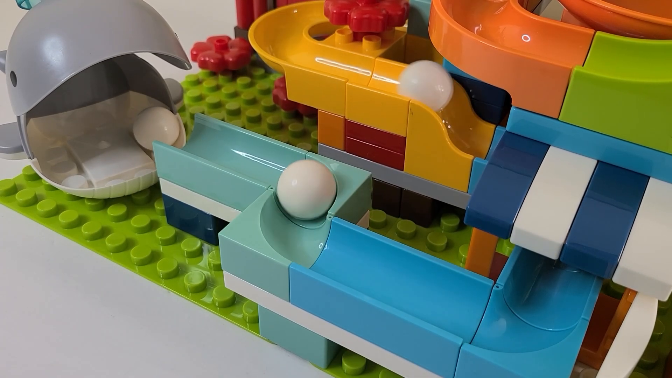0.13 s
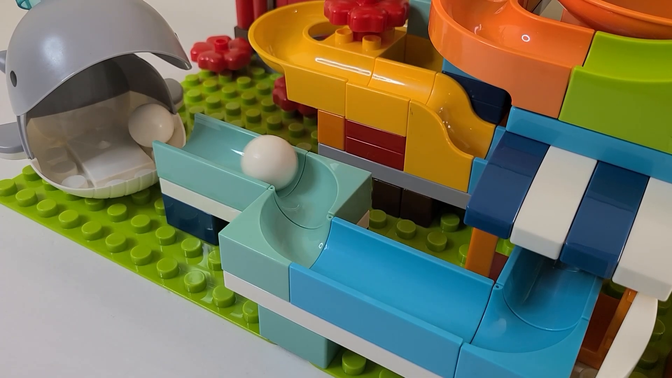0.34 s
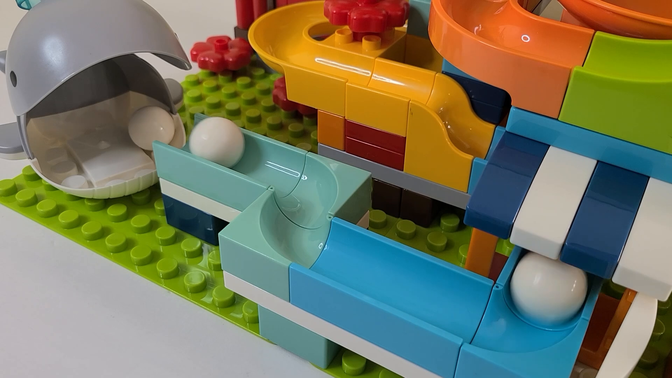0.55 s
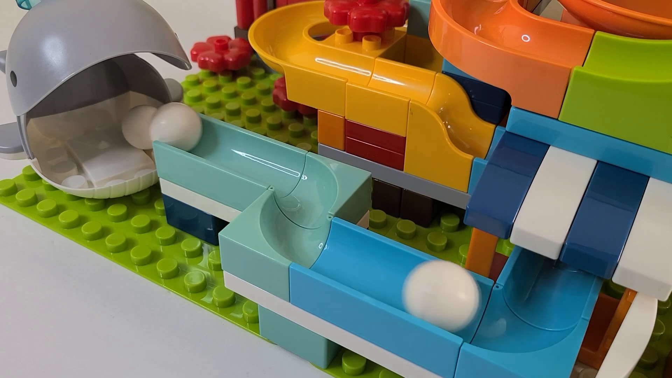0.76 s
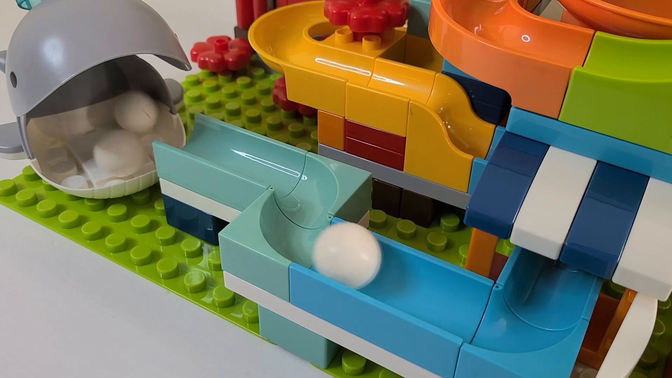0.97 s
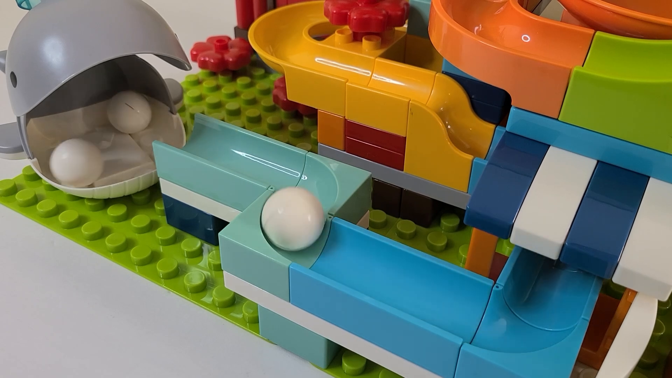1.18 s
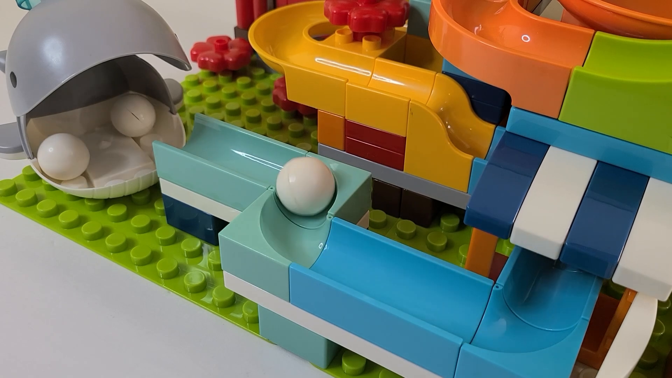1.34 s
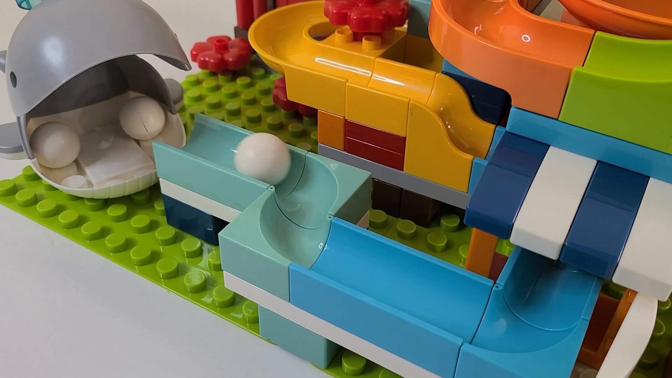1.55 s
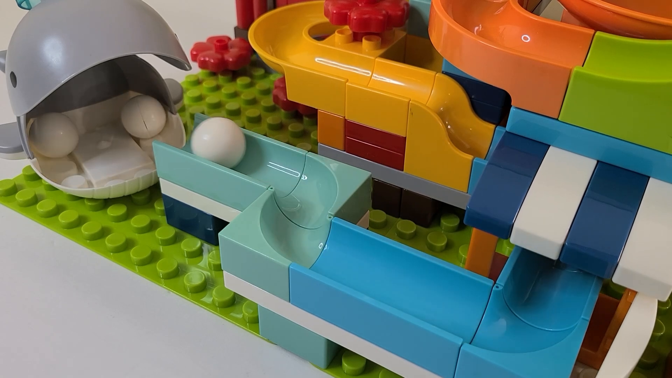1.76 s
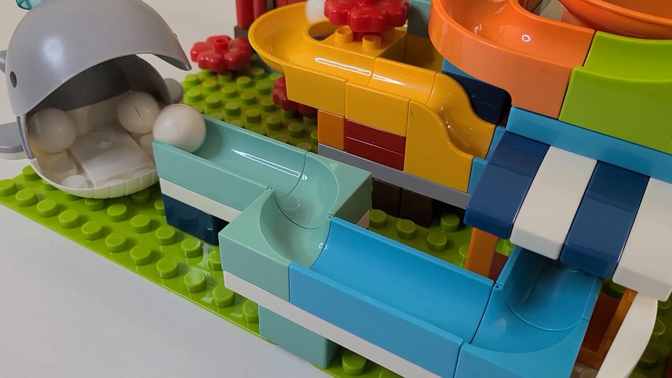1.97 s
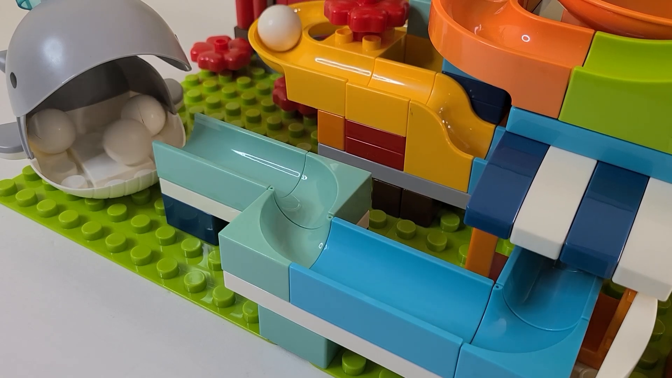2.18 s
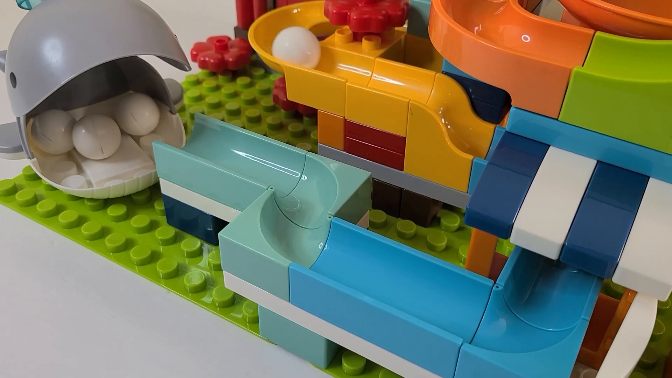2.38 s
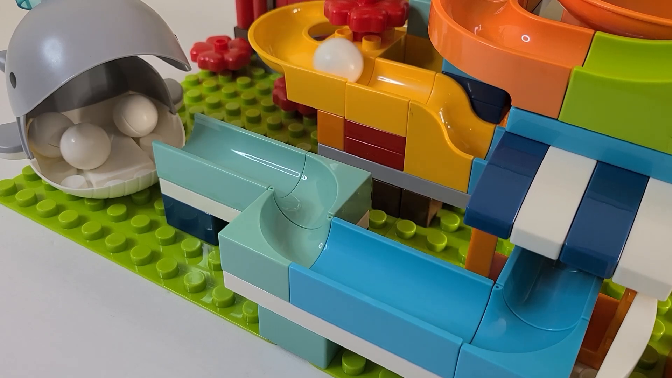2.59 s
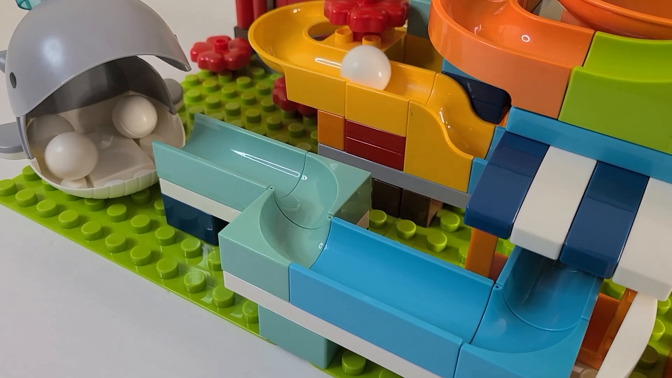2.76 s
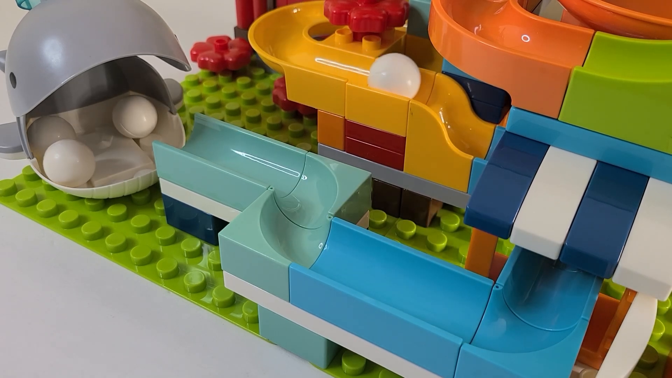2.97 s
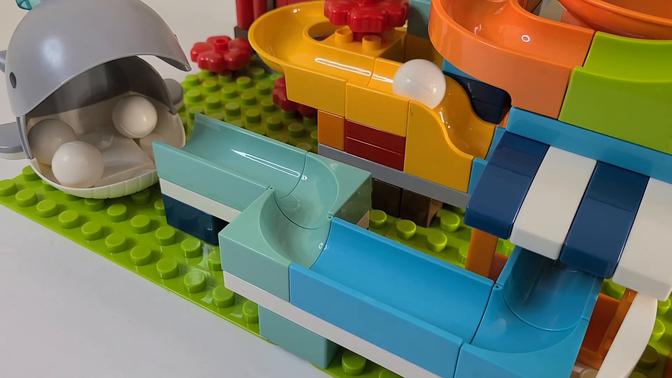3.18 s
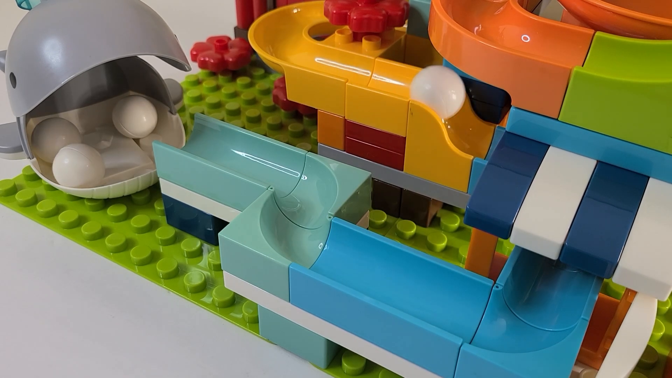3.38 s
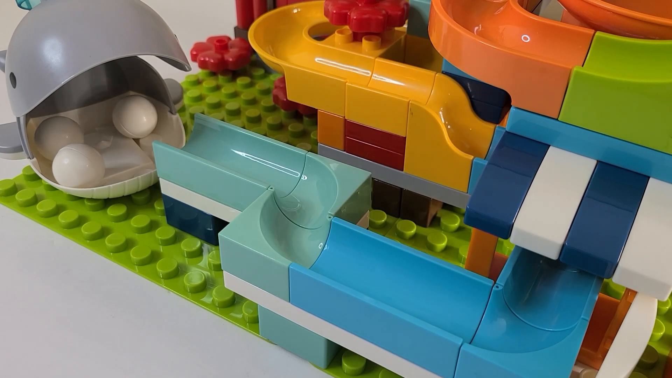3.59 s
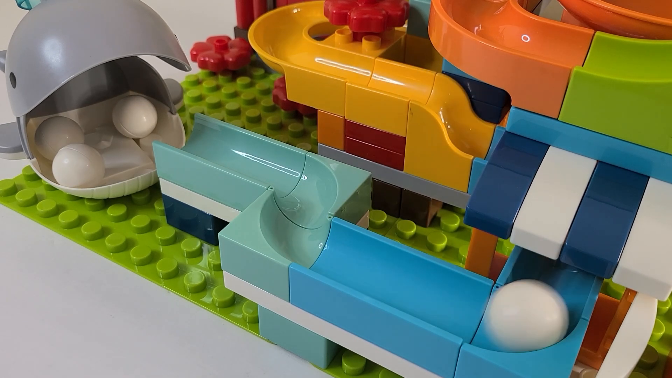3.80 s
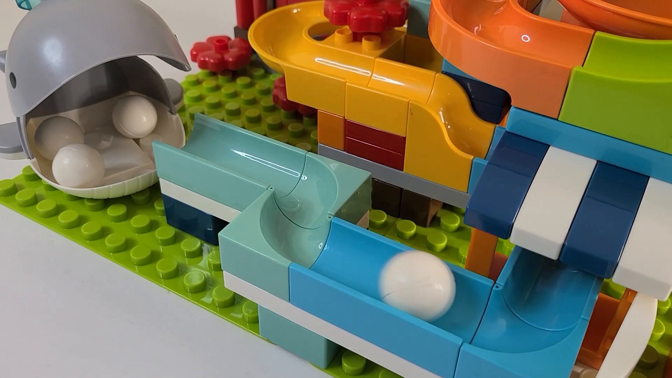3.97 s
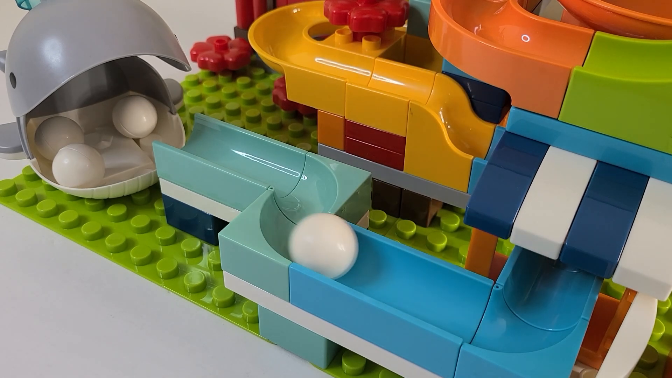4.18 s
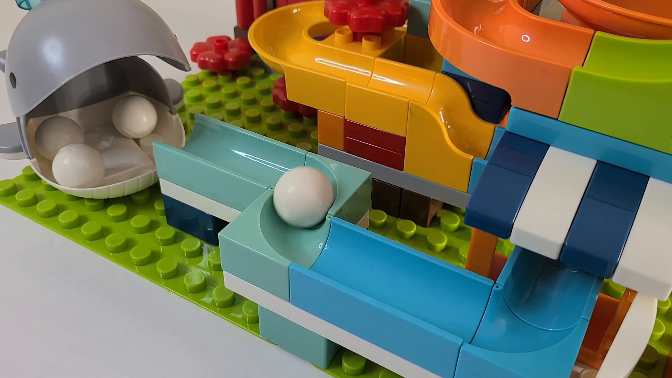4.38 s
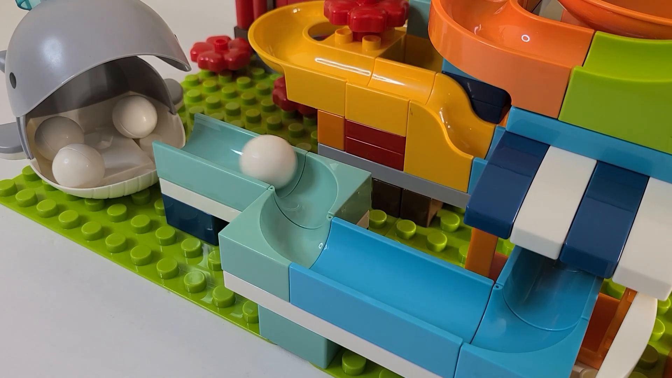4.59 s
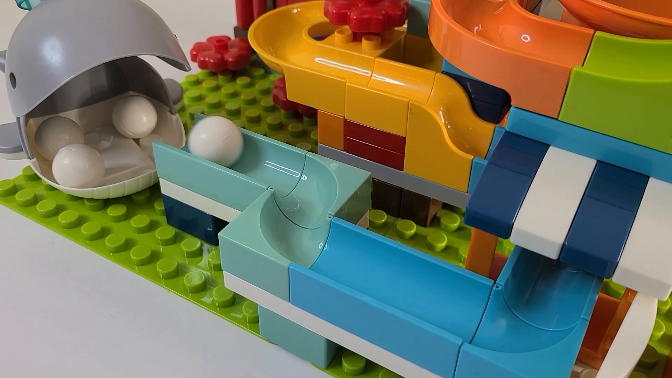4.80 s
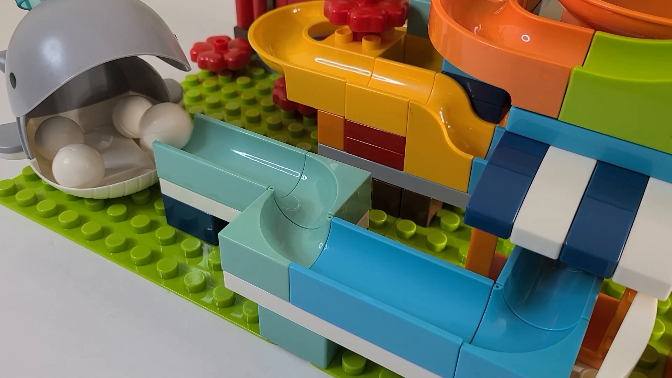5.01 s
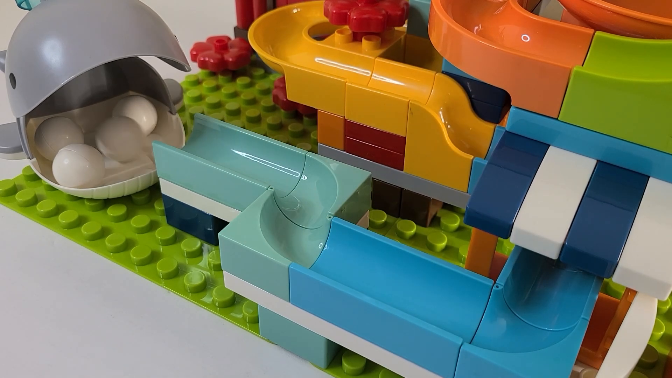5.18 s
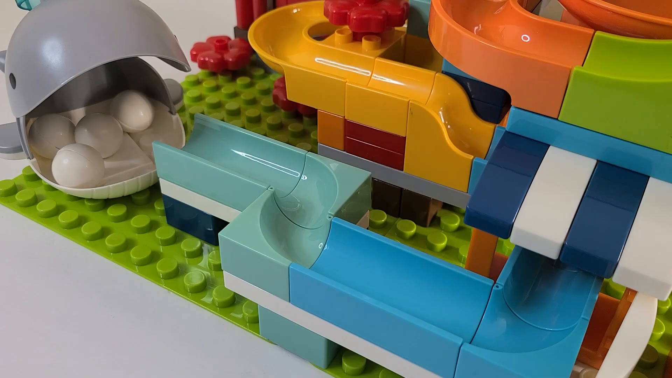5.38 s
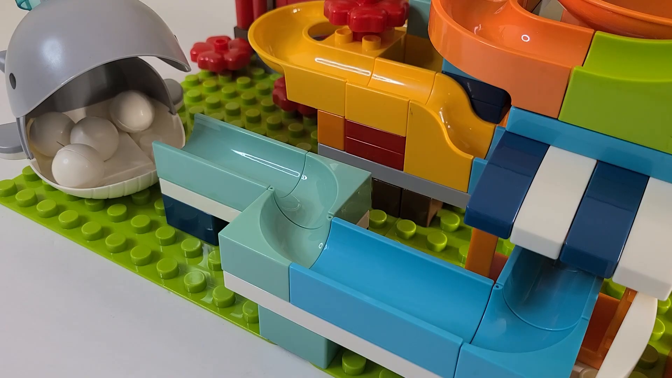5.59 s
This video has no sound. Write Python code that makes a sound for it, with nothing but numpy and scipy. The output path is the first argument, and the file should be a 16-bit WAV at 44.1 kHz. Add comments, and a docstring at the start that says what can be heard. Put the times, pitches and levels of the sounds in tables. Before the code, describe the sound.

Hard marbles roll and clatter down a hollow plastic block track, clicking at joints and dropping with sharp double clacks into a plastic capsule.

```python
"""Marbles clatter and roll down a track of hollow plastic building blocks, close up in a small room.
Each knock is a burst of dense wall modes plus a few modes of the piece; rolling is a stream of random tiny
impacts, shaped into rumble and chatter. Three drops crack on the rim of a capsule and clack on its floor.
Landings thump the base plate as decaying sines and a noise boom. A faint steady noise lies behind it all."""
import sys
import numpy as np
from scipy import signal
from scipy.fft import rfft, irfft
from scipy.io import wavfile
from scipy.ndimage import uniform_filter1d

SR = 44100
rng = np.random.default_rng(int(sys.argv[2]) if len(sys.argv) > 2 else 0)


def log_audio(samples):
    """Write samples as a 16-bit WAV file to the path given in sys.argv[1]."""
    # one column per channel
    frames = np.atleast_2d(samples).T
    # limit to full scale, then quantise
    limited = np.clip(frames, -1, 1)
    pcm = np.round(limited * 32767).astype(np.int16)
    wavfile.write(sys.argv[1], SR, pcm)


N = 249165
HZ = np.fft.rfftfreq(N, 1 / SR)


def amp(db):
    """Decibels to gain."""
    return 10 ** (np.asarray(db) / 20)


def read(points, hz):
    """Reads a table of frequency and value on a log-frequency axis."""
    table_hz, value = np.transpose(points)
    return np.interp(np.log(hz + 1), np.log(table_hz + 1), value)


def unit(x):
    """Scales to an energy of one per channel."""
    return x / np.sqrt(np.sum(x ** 2, -1, keepdims=True) + 1e-20)


def add(mix, s, sound):
    """Adds a stereo sound at time s in seconds."""
    start = max(round(s * SR), 0)
    part = mix[:, start:][:, :sound.shape[-1]]
    part += sound[..., :part.shape[-1]]


def coloured(x, spectrum):
    """Gives a steady sound a spectrum and an rms of one."""
    shaped = irfft(rfft(x) * amp(read(spectrum, HZ)), N)
    return np.sqrt(N) * unit(shaped)


def causal(db):
    """Minimum-phase response with this gain: it sounds only after its cause."""
    cepstrum = irfft(np.log(amp(db)))
    half = len(cepstrum) // 2
    cepstrum[1:half] *= 2
    cepstrum[half + 1:] = 0
    return np.exp(rfft(cepstrum))


def dying(noise, decays, rise):
    """Countless overlapping modes: noise whose bands swell briefly, then die at their own speeds."""
    size = noise.shape[-1]
    t, hz = np.arange(size) / SR, np.fft.rfftfreq(size, 1 / SR)
    centres, t60s = np.transpose(decays)
    out = 0
    for share, t60 in zip(np.eye(len(decays)), t60s):
        band = irfft(rfft(noise) * read(np.c_[centres, share], hz), size)
        envelope = np.exp(-np.log(1000) * t / t60) * (1 - np.exp(-t / rise))
        out = out + band * unit(envelope)
    return unit(out)


def pair(size, alike=0.26, count=10):
    """Noise at two microphones: the part they share reaches the right one `count` samples later."""
    left, own = rng.standard_normal((2, size))
    right = alike * np.roll(left, count) + np.sqrt(1 - alike ** 2) * own
    return np.array([left, right])


# Spectrum of the room rumble and microphone hiss.
# Each row: frequency in Hz, relative level in dB per Hz.
BACKGROUND_SPECTRUM = [(20, -11), (70, -0.5), (200, -5.5), (320, -5.5), (900, -31), (1300, -6), (2200, -21),
                       (3400, -15.5), (5000, -26.5), (6200, -10), (7600, -36.5), (11500, -28),
                       (16000, -28.5)]


def background(level_db=-66):
    """Room rumble and microphone hiss: steady noise with a fixed spectrum."""
    return amp(level_db) * coloured(rng.standard_normal((2, N)), BACKGROUND_SPECTRUM)


# How long the echoes of the room last.
# Each row: frequency in Hz, decay time t60 in seconds.
ROOM_DECAYS = [(150, 0.96), (600, 0.37), (2000, 0.24), (5000, 0.3), (12000, 0.31)]


def room(x, wet_db=-9, treble_db=-6.5, delay=0.0064):
    """Diffuse echoes of a small furnished room, which soaks up the treble."""
    tail = np.zeros((2, SR))
    add(tail, delay, dying(rng.standard_normal((2, SR)), ROOM_DECAYS, rise=0.001))
    damping_db = read([(1500, 0), (8000, treble_db)], np.fft.rfftfreq(SR, 1 / SR))
    tail = irfft(rfft(tail) * causal(damping_db))
    echoes = signal.fftconvolve(x, tail, axes=1)[:, :N]
    return x + amp(wet_db) * echoes


# Stereo width over frequency.
# Each row: frequency in Hz, gain of the side relative to the mid in dB.
STEREO_WIDTH = [(100, -7), (250, -12), (500, -6.5), (1100, -0.5)]


def microphones(x):
    """Long waves reach both microphones more alike than short ones."""
    left, right = rfft(x)
    width = amp(read(STEREO_WIDTH, HZ))
    mid, side = left + right, width * (left - right)
    return irfft(np.array([mid + side, mid - side]) / np.sqrt(2 + 2 * width ** 2), N)


# Resonances of the assembled track, heard in every knock and in the rolling.
# Each row: frequency in Hz, width in Hz, peak in dB.
TRACK_RESONANCES = [(299.2, 10, 12.5), (451.5, 57, 7.5), (730, 79, 1.5), (1222, 97, 5), (1710, 9.9, 8),
                    (4730, 29, 1)]


def body(x):
    """The joined blocks favour a few fixed pitches."""
    gain = 1 + sum((amp(db) - 1) / (1 + 2j * (HZ - hz) / width) for hz, width, db in TRACK_RESONANCES)
    response = irfft(gain, N)[:SR // 5]
    return signal.fftconvolve(x, response[None], axes=1)[:, :N]


# Lighter landings along the track that shake the base plate.
# Each row: start in seconds, level in dB.
LIGHT_LANDINGS = [(0.186, -46.5), (0.213, -54.5), (0.578, -46), (1.214, -51), (1.24, -41), (3.776, -53)]
# How hard the two blows of a drop shake the base plate, before the strength of that drop (dB)
RIM_THUMP_DB, FLOOR_THUMP_DB = -28.5, -30


def landings():
    """All blows that reach the base plate: the light ones on the track and two for each drop."""
    rims = [(s, db + RIM_THUMP_DB) for s, fall_s, db in CAPSULE_DROPS]
    floors = [(s + fall_s, db + FLOOR_THUMP_DB) for s, fall_s, db in CAPSULE_DROPS]
    return LIGHT_LANDINGS + rims + floors


# Modes of the base plate on the table.
# Each row: frequency in Hz, typical level relative to the thump in dB, decay time t60 in seconds.
PLATE_MODES = [(59.85, -2, 0.34), (76, 3, 0.22), (91, 0, 0.15), (164.7, -1, 0.36), (252, 2.5, 0.13),
               (293.5, 0.5, 0.28), (338.8, 0, 0.14), (412.3, -11, 0.4)]


def thumps(boom_db=-12, boom_t60=0.29, vary_db=3.0):
    """A landing marble sets the low modes of the base plate swinging and shakes the loose blocks on it."""
    t, out = np.arange(SR // 2) / SR, np.zeros((2, N))
    hz, mode_db, t60 = np.transpose(PLATE_MODES)[:, :, None]
    signs = (-1) ** np.arange(len(PLATE_MODES))[:, None]
    modes = signs * np.sin(2 * np.pi * hz * t) * np.exp(-np.log(1000) * t / t60)
    band = signal.butter(2, [90, 380], "band", fs=SR, output="sos")
    onset = 1 - np.exp(-t / 0.00056)
    for s, db in landings():
        # the spot of the landing decides how strongly each mode answers
        answer_db = mode_db + vary_db * rng.standard_normal(hz.shape)
        swing = (amp(answer_db) * modes).sum(0)
        shaking = unit(signal.sosfilt(band, rng.standard_normal((2, len(t)))))
        boom = np.sqrt(len(t)) * shaking * np.exp(-np.log(1000) * t / boom_t60)
        add(out, s, amp(db) * (swing + amp(boom_db) * boom) * onset)
    return out


# A marble rolls along one piece.
# Each row: start in seconds, length in seconds, level on entry in dB, name of the piece.
ROLLING_RUNS = [(0, 0.19, -38.5, "ramp"), (0.382, 0.26, -39, "tunnel"), (0.671, 0.21, -41, "trough"),
                (1, 0.21, -38, "capsule"), (1.248, .32, -38, "bend"), (1.611, 0.62, -46.5, "chute"),
                (2.199, 0.223, -40.5, "capsule"), (2.74, 0.3, -46, "ramp"), (3.028, 1, -50.5, "ramp"),
                (3.544, 0.26, -38.5, "tunnel"), (3.793, 0.17, -44, "trough"),
                (4.115, 0.41, -52.5, "trough"), (4.435, 0.095, -48, "bend exit"),
                (4.568, 0.55, -53.5, "chute"), (5.284, 0.13, -35, "capsule")]
# Every run swells, sags as the marble slows, and dies as it leaves the piece
SWELL_S, SLOWING_DB_PER_S, LEAVING_DB_PER_S = 0.02, 7, 294.5
# Share of a piece's weight that its rolling rumble gets
ROLL_WEIGHT = 0.25


def contact(weighted):
    """Level in dB of the loudest run at each moment; weighted, it includes a share of the piece's low gain."""
    t = np.arange(N) / SR
    level = np.full(N, 1e-5)
    for start, length, entry_db, piece in ROLLING_RUNS:
        age = np.maximum(t - start, 0)
        db = entry_db - SLOWING_DB_PER_S * age - LEAVING_DB_PER_S * np.maximum(age - length, 0)
        weight_db = weighted * ROLL_WEIGHT * TRACK_PIECES[piece][0]
        swell = np.minimum(age / SWELL_S, 1)
        level = np.maximum(level, swell * amp(db + weight_db))
    return 20 * np.log10(level)


def bumps(per_s, spread_db):
    """Random tiny impacts of a marble on the uneven surface, a few much larger than the rest."""
    size = amp(spread_db * np.minimum(rng.exponential(1, N), 3))
    hits = rng.random(N) < per_s / SR
    train = size * hits * rng.choice([-1, 1], N)
    walls = dying(pair(SR // 10), PLASTIC_DECAYS, rise=0.000097)
    return signal.fftconvolve(train[None], walls, axes=1)[:, :N]


# Spectrum of the troughs under a rolling marble.
# Each row: frequency in Hz, relative level in dB per Hz.
TROUGH_SPECTRUM = [(30, -23.5), (70, 2.5), (125, -11), (200, -10), (310, -6.5), (550, -5), (900, -1),
                   (1300, 0.5), (1800, -2.5), (3000, -15.5), (5000, -22), (16000, -39.5)]
# Spectrum of the fine chatter of a fast marble.
# Each row: frequency in Hz, relative level in dB per Hz.
CHATTER_SPECTRUM = [(300, -19.5), (1250, 6), (2800, -2), (4500, -20), (6600, -15), (8200, -31),
                    (16000, -23.5)]


def rolling(rumble_db=-4, mids_db=-4, chatter_db=-9, fast_db=-39, steepness=1.8, dulling=0.62,
            split_hz=950, lumpy_db=2.5, lump_s=0.022):
    """Rolling rumbles in the troughs; a slow, quiet marble sounds dull, a fast one also chatters."""
    t = np.arange(N) / SR
    # the marble sways between the walls, so its pressure comes in lumps
    lumps_db = lumpy_db * np.interp(t / lump_s, np.arange(N), rng.standard_normal(N))
    level_db, low_db = contact(weighted=False) + lumps_db, contact(weighted=True) + lumps_db
    # how far the level lies below that of a fast marble
    slow_db = np.minimum(level_db - fast_db, 0)
    # blocks have their own resonances: three sets of wall modes fade in and out in turn
    journey = np.cos(np.pi * (3 * t + np.arange(3)[:, None] / 3))
    grains = sum(share * bumps(per_s=160, spread_db=4.5) for share in journey)
    skips = sum(share * bumps(per_s=60, spread_db=4) for share in journey)
    rumble = coloured(grains, TROUGH_SPECTRUM)
    lows = signal.sosfiltfilt(signal.butter(3, split_hz, fs=SR, output="sos"), rumble)
    mids = amp(level_db + mids_db + dulling * slow_db) * (rumble - lows)
    chatter = amp(level_db + chatter_db + steepness * slow_db) * coloured(skips, CHATTER_SPECTRUM)
    return amp(low_db + rumble_db) * lows + mids + chatter


def patches(hz, spacing_hz):
    """Random narrow peaks and dips over frequency: each spot on a block rings in its own way."""
    heights = rng.standard_normal(len(hz))
    return np.interp(hz / spacing_hz, np.arange(len(hz)), heights)


def ring(hz, ring_hz, size, sharpness=17, contact_s=0.0062):
    """The first instant of a blow starts one mode, which dies within a few dozen cycles."""
    kick = pair(size, count=2) * np.exp(-np.arange(size) / SR / contact_s)
    detuning = hz / ring_hz - ring_hz / (hz + 1)
    # a sharp resonance, then a broad one at the same pitch
    return unit(irfft(rfft(kick) / (1 + 1j * sharpness * detuning) / (1 + 1j * detuning)))


# Colour of a knock on the hollow blocks.
# Each row: frequency in Hz, relative level in dB.
PLASTIC_COLOUR = [(60, -16), (200, -8.5), (300, -9), (550, -5), (850, -1.5), (1250, 5), (2000, 2.5),
                  (3000, -5.5), (4300, -10), (5300, -16.5), (6600, -13.5), (8200, -29.5), (12000, -25),
                  (16000, -32.5)]
# How long the blocks ring, in knocks and under a rolling marble.
# Each row: frequency in Hz, decay time t60 in seconds.
PLASTIC_DECAYS = [(300, 0.24), (1300, 0.093), (3500, 0.077), (10000, .032)]


def knock(strength_db, hard_db, weight_db, modes, patchy_db=4, pivot_hz=1500, hard_hz=8500,
          heavy_hz=650, size=4096):
    """A marble hits a block: a clack of dense wall modes, and the modes of that piece that stand out."""
    hz = np.fft.rfftfreq(size, 1 / SR)
    wall_noise = dying(pair(size), PLASTIC_DECAYS, rise=0.00067)
    walls = rfft(wall_noise) * causal(patchy_db * patches(hz, spacing_hz=88.33))
    # single modes vary at random, but every broad band takes its even share of the blow
    uneven_db = 10 * np.log10(uniform_filter1d((abs(walls) ** 2).mean(0), size=45))
    # a hard contact brings out the treble, a heavy one the lows
    contact_db = read([(heavy_hz, weight_db), (pivot_hz, 0), (hard_hz, hard_db)], hz)
    clack = irfft(walls * causal(contact_db + read(PLASTIC_COLOUR, hz) - uneven_db))
    rings = sum(amp(db) * ring(hz, ring_hz, size) for ring_hz, db in modes)
    return amp(strength_db) * (amp(-0.5) * clack + amp(-5.5) * rings)


# A marble drops off the end of the track, hits the rim of the capsule, then its floor.
# Each row: start in seconds, fall from rim to floor in seconds, strength added to both blows in dB.
CAPSULE_DROPS = [(.951, .0595, -3), (2.193, .053, -3), (5.179, .054, -3)]
# The blow on the rim, then the one on the floor. Each holds: strength in dB, hardness as treble gain in dB,
# weight as low gain in dB, and modes as frequency in Hz and relative level in dB.
RIM_KNOCK = (10.86, 25.1, 8.5, [(1170, -4), (2850, -6), (4700, -3)])
FLOOR_KNOCK = (19.14, 16.8, 0.86, [(1640, -8.5), (2300, -8), (4200, -5.5)])


def drops():
    """Each drop into the capsule gives a sharp crack on the rim and a fuller clack on the floor."""
    out = np.zeros((2, N))
    for s, fall_s, db in CAPSULE_DROPS:
        add(out, s, amp(db) * knock(*RIM_KNOCK))
        add(out, s + fall_s, amp(db) * knock(*FLOOR_KNOCK))
    return out


# The pieces of the track, by name; the rolling takes their weights too.
# Each entry: weight as low gain in dB, then modes as frequency in Hz and relative level in dB.
TRACK_PIECES = {"ramp": (1.5, [(1300, -6), (1610, -10.5)]), "tunnel": (2.7, [(1900, -5), (2780, -4),
                (3900, -13.5)]), "corner": (4.9, [(1790, -4.5), (2600, -12.5)]),
                "trough": (10.25, [(800, -5), (2400, -4), (3000, -10)]), "bend": (2.08, [(1320, -6.5),
                (3230, -7.5)]), "bend exit": (12.3, [(1530, 5)]), "chute": (0, [(2810, -1.5),
                (3020, -8.5)]), "capsule": (-1.5, [(1210, -9), (1600, -8)])}
# A marble knocks against a joint or a wall.
# Each row: start in seconds, strength in dB, hardness as treble gain in dB, piece whose modes sound.
TRACK_KNOCKS = [(.055, 1.5, 7.5, "bend"), (.174, -4.5, 9, "bend"), (.242, -2.5, -12, "chute"),
                (.342, 10, 10.5, "tunnel"), (.36, 10, 10.5, "tunnel"), (.378, 3, 13, "tunnel"),
                (.53, -0.5, -4.5, "corner"), (0.561, -3.5, 7, "corner"), (0.577, 7, 11, "corner"),
                (0.617, -4, 7, "corner"), (0.636, -4.5, -27, "ramp"), (.695, -4, 16, "trough"),
                (.717, -2, 5, "trough"), (.755, -2.5, 9, "trough"), (0.78, 4, 16, "trough"),
                (0.8, -7, -3, "trough"), (.922, -6, 3, "capsule"), (0.987, 9.5, 16.5, "capsule"),
                (1.044, 10, 3, "capsule"), (1.128, -4, -1, "capsule"), (1.212, 13.5, 9.5, "bend"),
                (1.239, 11.5, 12.5, "bend"), (1.271, 6.5, 3, "bend"), (1.31, 0, 18, "capsule"),
                (1.397, -4, 11.5, "capsule"), (1.435, -2, 3, "chute"), (1.48, -0.5, -9, "capsule"),
                (1.505, 6.5, 4, "chute"), (1.531, -1, 11.5, "chute"), (1.617, -6, 7, "chute"),
                (1.7, -6.5, 6, "ramp"), (1.757, -9.5, 4, "ramp"), (1.792, -6.5, -3, "chute"),
                (1.835, -18, -13, "chute"), (1.887, -9, -9, "tunnel"), (1.974, -3, -7, "capsule"),
                (2.015, -14, 15.5, "ramp"), (2.075, -10, 8, "tunnel"), (2.137, -14, 7, "ramp"),
                (2.345, 1, 10.5, "capsule"), (2.388, -1, 13, "capsule"), (2.4, 8, 19.5, "capsule"),
                (2.581, -3, 5, "ramp"), (2.607, -6.5, 3.5, "ramp"), (2.682, -10.5, -15, "ramp"),
                (2.746, -7, 3, "ramp"), (2.809, -2.5, 1.5, "ramp"), (2.871, -1, 7, "ramp"),
                (2.922, 0, 15, "ramp"), (2.995, -10.5, 0, "ramp"), (3.187, -14.5, -7, "ramp"),
                (3.323, -4, 15.5, "ramp"), (3.436, -12.5, -7, "ramp"), (3.54, 2.5, 5, "tunnel"),
                (3.554, 4.5, 1.5, "tunnel"), (3.573, 0, 4, "tunnel"), (3.633, -3, 2, "ramp"),
                (3.776, 4, -3.5, "corner"), (3.794, 4.5, 7.5, "corner"), (3.823, -5, -3, "tunnel"),
                (3.882, -4.5, 14.5, "trough"), (3.9, -1.5, 12, "trough"), (3.96, 0, 15, "trough"),
                (3.981, -5, 10, "trough"), (4.112, -16, 14, "trough"), (4.138, -14, 18, "trough"),
                (4.308, -9.5, 10.5, "trough"), (4.322, -9.5, 13.5, "trough"), (4.437, -14, -3, "ramp"),
                (4.485, -13.5, 2.5, "bend exit"), (4.499, -14.5, 4, "bend exit"),
                (4.646, -22, -18, "bend exit"), (4.71, -22, 1, "bend exit"), (4.855, -19, -6, "chute"),
                (5.0, -23.5, 1.5, "trough"), (5.337, 0, 19.5, "capsule"), (5.363, 3, 18, "capsule"),
                (5.379, 1.5, 10, "capsule"), (5.404, 1.5, 4, "capsule"), (5.449, -0.5, 10.5, "capsule"),
                (5.593, -12, -20.5, "capsule"), (5.614, -16, -5, "capsule")]


def knocks(rebound_db=-8, rebound_s=0.0081):
    """Every click and clack along the track; each touch skips once more, relatively weaker after a hard blow."""
    out = np.zeros((2, N))
    for s, strength_db, hard_db, piece in TRACK_KNOCKS:
        sound = knock(strength_db, hard_db, *TRACK_PIECES[piece])
        add(out, s, sound)
        # the second touch is softer, so it has less treble
        skip = amp(rebound_db - max(strength_db, 0)) * uniform_filter1d(sound, size=7)
        add(out, s + rebound_s * rng.uniform(0.85, 1.8), skip)
    return out


def scene(left_db=0.25):
    """Track and base plate in the room, over a faint background."""
    marbles = body(knocks() + drops() + rolling())
    track = microphones(room(marbles) + background())
    plate = room(thumps(), wet_db=-15.5)
    # the track leans slightly left, the plate slightly right
    return track * amp([[left_db], [-left_db]]) + plate * amp([[-left_db], [left_db]])


def record(dry, edge_hz=16100):
    """Clips at full scale, then cuts the treble above the band edge."""
    low_pass = signal.firwin(511, edge_hz, window=("kaiser", 9), fs=SR)
    return signal.oaconvolve(np.clip(dry, -1, 1), low_pass[None], "same", axes=1)


dry = scene()
out = record(dry)
log_audio(out)
```